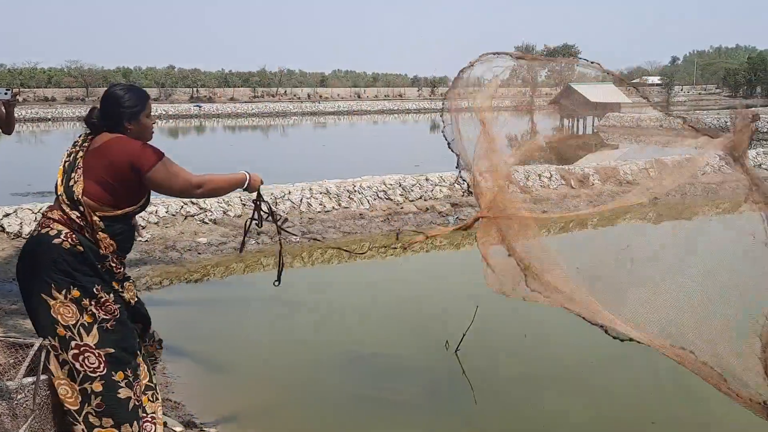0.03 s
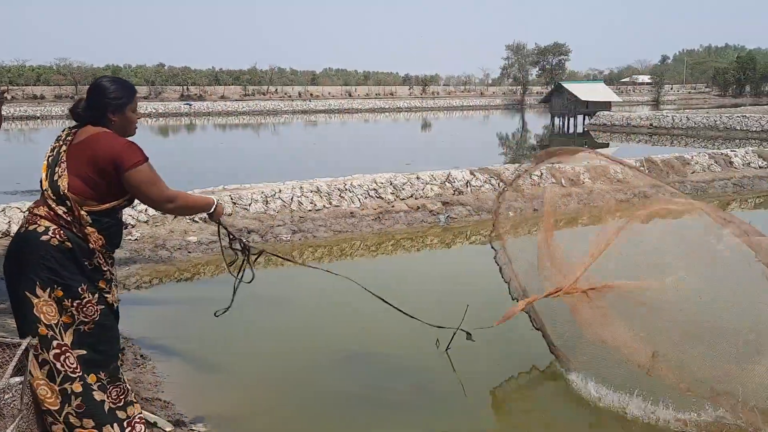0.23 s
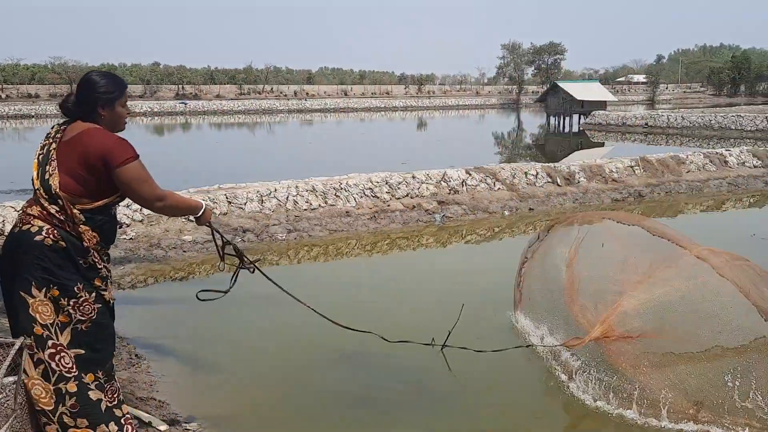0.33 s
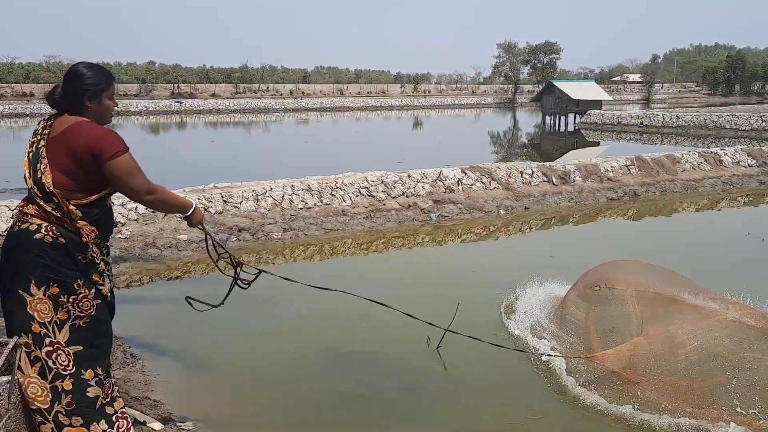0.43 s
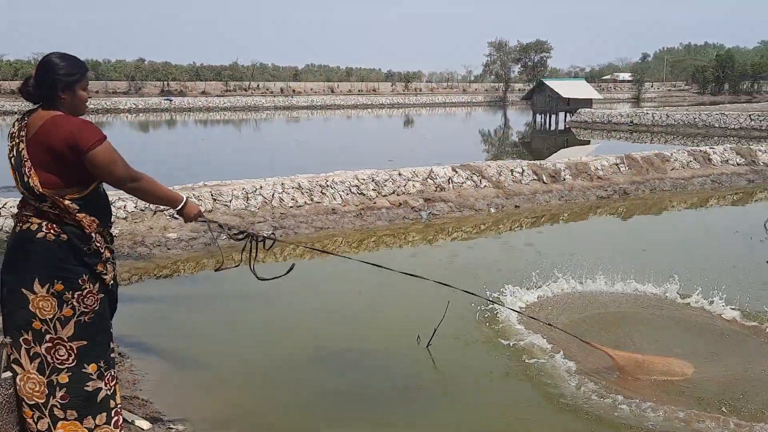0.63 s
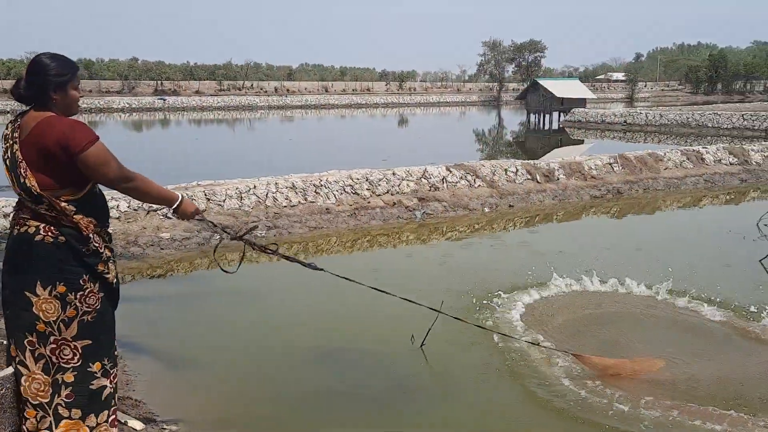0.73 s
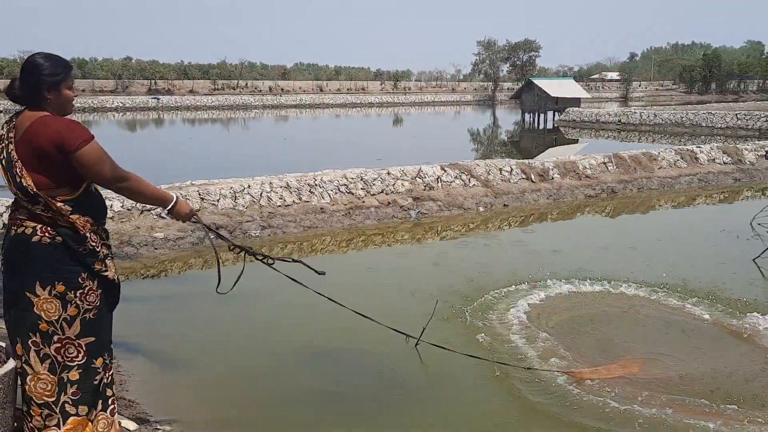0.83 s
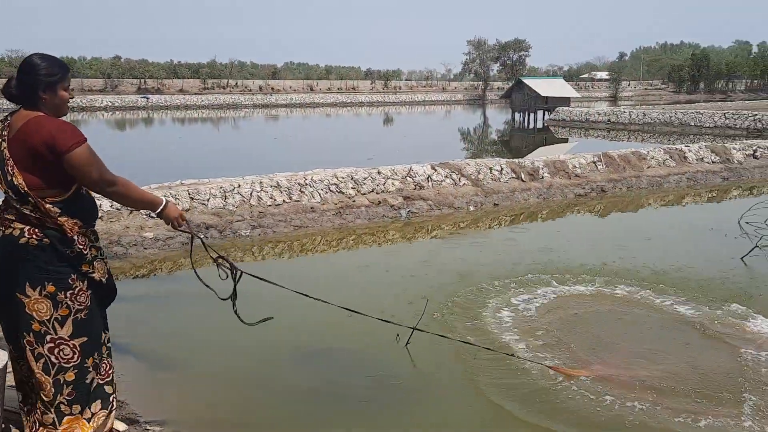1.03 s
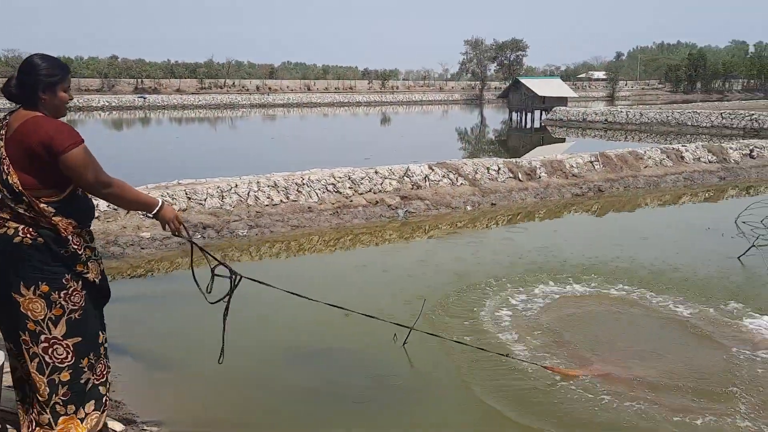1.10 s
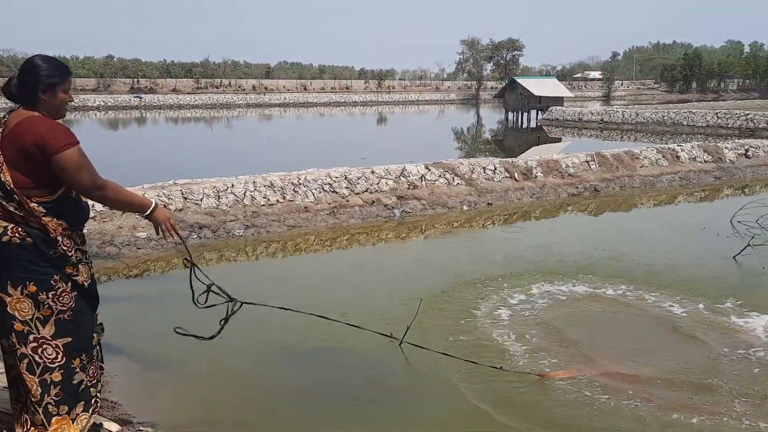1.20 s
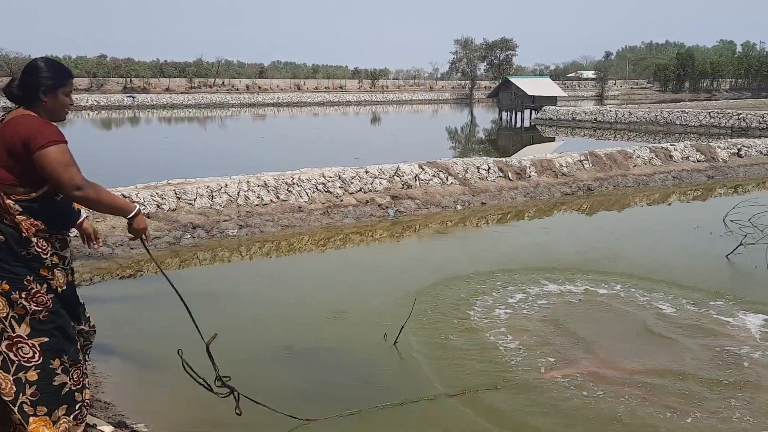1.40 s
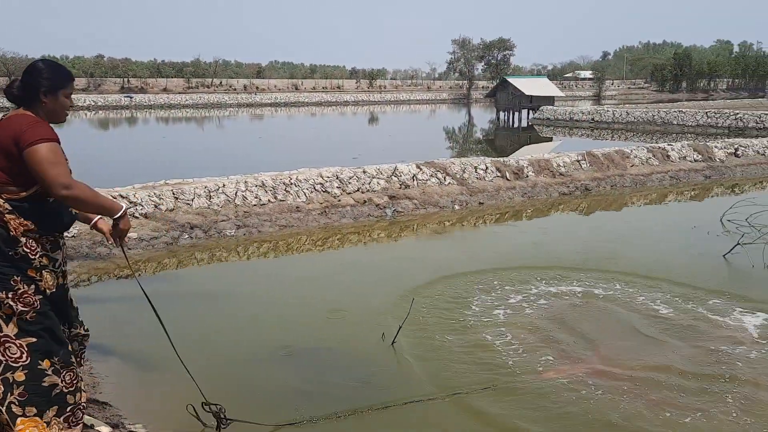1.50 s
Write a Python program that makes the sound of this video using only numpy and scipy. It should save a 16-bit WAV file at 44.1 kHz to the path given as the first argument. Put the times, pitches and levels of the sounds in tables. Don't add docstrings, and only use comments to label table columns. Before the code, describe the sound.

A weighted cast net hits a pond with a broad, sharp splash after a faint swish and tiny clinks; trapped air gurgles, foam fizzes out, and a wet line flicks softly, outdoors on a stereo microphone.

```python
import sys
import numpy as np
from scipy import signal
from scipy.fft import rfft, irfft, next_fast_len
from scipy.io import wavfile
from scipy.ndimage import uniform_filter1d, map_coordinates

SR = 44100
rng = np.random.default_rng(int(sys.argv[2]) if len(sys.argv) > 2 else 0)


def makeup_ratio(level_db):
    decades = np.asarray(level_db, float) / 20
    return 10 ** decades


def dump_mix(stems):
    frames = np.atleast_2d(stems).T
    limited = np.clip(frames, -1, 1)
    pcm = np.round(limited * 32767).astype(np.int16)
    wavfile.write(sys.argv[1], SR, pcm)


N = 68355
TIME = np.arange(N) / SR

# time_s, level_db
SPRAY_LEVEL = [(.2342, -77.5), (.2365, -43), (.243, -32), (.26, -29.5), (.284, -39.5), (.32, -35),
               (.36, -34), (.5, -35), (.518, -34.5), (.538, -36.5), (.556, -39.5), (.68, -43.5),
               (.78, -44.5), (.81, -40.5), (.83, -44.5), (1.1, -56.5), (1.3, -57), (1.55, -60)]
# pitch_hz, level_db (per Hz)
SPRAY_TONE = [(1300, -24.5), (1900, -5.5), (2300, -2), (3400, -6), (6300, -4.5), (9300, -13.5),
              (11500, -10), (13500, -10.5), (15800, -19)]
FINE_FOAM_S = (0.251, .3, 0.902, 1.203)
# time_s, level_db
GURGLE_LEVEL = [(0.24, -54), (0.256, -44.5), (0.304, -28.5), (0.312, -23.5), (0.336, -28.5), (0.402, -26),
                (0.434, -21), (0.464, -27.5), (0.472, -24.5), (0.588, -23), (0.608, -31), (0.674, -34),
                (0.87, -34), (1.038, -45.5), (1.046, -41), (1.082, -46.5), (1.266, -61), (1.29, -66)]
# pitch_hz, level_db (per Hz)
GURGLE_TONE = [(70, -60), (130, -27.5), (470, -6), (950, -5.5), (2500, -8), (3200, -18.5), (5000, -21.5),
               (7000, -50)]
SMALL_BUBBLES_S = (0.83, 1.247)
# start_s, peak_db, pitch_hz
POCKETS = [(.255, -38.5, 1190), (.256, -36, 2440), (.296, -46, 690), (.309, -21.5, 582), (.31, -30, 1340),
           (.311, -24.5, 972), (.312, -27.5, 1192), (.313, -27.5, 800), (.314, -33, 1610),
           (.325, -27.5, 604), (.34, -26.5, 890), (.377, -28.5, 439), (.407, -31.5, 289), (.414, -30, 2340),
           (.423, -24.5, 943), (.424, -32, 1440), (.427, -34, 743), (.43, -18.5, 539), (.435, -31, 2570),
           (.442, -27, 623), (0.453, -31, 1335), (0.468, -23, 430), (.472, -28, 812), (0.481, -29, 928),
           (.49, -22.5, 570), (.495, -28, 845), (.501, -22.5, 472), (.509, -25.5, 1242), (.522, -24.5, 578),
           (.534, -25.5, 538), (.545, -31.5, 728), (.55, -30, 355), (0.57, -44, 404), (0.57, -25.5, 1874),
           (.571, -30, 545), (.578, -26, 770), (0.587, -35.5, 409), (0.649, -35.5, 491), (.667, -40.5, 324),
           (.687, -44, 814), (.728, -32.5, 1232), (0.765, -44, 932), (0.787, -31.5, 1656),
           (.808, -38.5, 835), (0.813, -39.5, 351), (.857, -30.5, 506), (.875, -36.5, 518),
           (.891, -34.5, 1814), (.895, -39.5, 491), (0.936, -37.5, 532), (.944, -39, 2290),
           (.957, -44.5, 416), (1.009, -41, 556), (1.039, -41.5, 1132), (1.045, -35, 1663),
           (1.051, -46.5, 492), (1.145, -51.5, 1137), (1.191, -52.5, 1650), (1.236, -51, 1884),
           (1.25, -49.5, 2660),
           (.26, -52, 600), (.654, -35, 1753), (.721, -45, 922), (.878, -47, 1130), (.905, -45, 550),
                (.92, -45, 880), (.99, -47, 494), (1.097, -57, 298), (1.12, -61, 300), (1.12, -66, 590),
                (1.145, -62, 880), (1.15, -52, 1770), (1.185, -60, 2220), (1.257, -57, 2230),
                (1.258, -66, 1110)]
# start_s, level_db
SLAPS = [(.2474, -29), (.4165, -27), (.466, -27), (.4864, -20), (.5052, -27), (.5108, -19), (.5145, -24),
         (.5205, -25), (.5255, -21), (.607, -33), (.687, -35), (.791, -32), (.811, -32)]
# start_s, level_db
PLUNGES = [
    (.3118, -24),
    (.4255, -33),
    (.4385, -26),
    (.577, -29),
    (.581, -29),
    (.859, -37),
    (1.256, -54),
]
# pitch_hz, level_db
PLUNGE_TONE = [(200, -50), (420, -2), (600, 0), (1000, -6), (2000, -9), (3200, -18), (5000, -50)]
# start_s, level_db
FLICKS = [
    (1.4645, -52),
    (1.468, -41),
    (1.471, -50),
    (1.4748, -52),
    (1.4787, -42),
    (1.483, -51),
    (1.487, -53),
]
# pitch_hz, level_db
FLICK_TONE = [(1500, -45), (2400, -12), (3700, -12), (6000, 0), (7700, -4), (9300, -15), (11500, -9),
              (14000, -9), (15800, -18)]
# start_s, level_db
TICKS = [
    (.0805, -57),
    (.1128, -52),
    (.1556, -42),
    (.159, -55),
    (.1875, -62),
    (.2205, -53),
]
# pitch_hz, level_db
TICK_TONE = [(1500, -36), (2870, -15), (4000, -30), (5300, -14), (6900, -3), (9500, -17), (12500, 0),
             (15800, -8)]
# pitch_hz, t60_s (time to fade by 60 dB)
BANGLE_RINGS = [
    (9330, .045),
    (10900, .035),
    (11400, .04),
    (13900, .018),
]
# start_s, then level_db of each ring
CLINKS = [(.059, -54, -55, -75, -57), (.0707, -62, -75, -75, -48), (.0805, -75, -51, -54, -68),
          (.1126, -75, -60, -64, -53), (.118, -60, -58, -68, -62), (.171, -59, -60, -62, -72),
          (.1875, -61, -53, -62, -70), (.203, -62, -70, -75, -75)]
# start_s, peak_db, pitch_hz
TAPS = [
    (0.04, -51, 960),
    (0.073, -54, 4930),
]
# pitch_hz, width_hz, level_db
CORD_TONES = [
    (820, 75, 6),
    (1410, 45, 8.5),
    (1586, 44, 9.5),
    (1750, 18, 5),
]
# time_s, level_db
CORD_PULL = [(0, -76), (.11, -67.5), (.16, -75), (.2, -84)]
# time_s, level_db
SWISH_LEVEL = [(0, -56.5), (.04, -53.5), (.075, -56.5), (.1, -75.5), (.16, -86), (.22, -83.5)]
# pitch_hz, level_db (per Hz)
SWISH_TONE = [(120, -67), (290, -17), (500, -29), (1570, -11.5), (2400, -17.5), (5500, -17), (8500, -24),
              (15800, -23)]
# time_s, level_db
BREEZE_LEVEL = [(0.0, -81), (0.128, -88), (0.318, -79), (0.574, -71.5), (1.004, -80), (1.096, -80),
                (1.55, -79)]
# pitch_hz, level_db (per Hz)
RUMBLE_TONE = [(12, -61.5), (32, -5.5), (90, 1), (124, -1.5), (231, -11.5), (520, -19), (600, -22.5),
               (780, -62), (1320, -120)]
# time_s, level_db
PUFFS = [
    [(.062, -92), (.075, -62), (.185, -67), (.2, -79)],
    [(1.4, -86), (1.425, -67), (1.48, -71), (1.52, -82.5)],
]
# pitch_hz, level_db
PUFF_TONE = [(30, -54), (70, -16), (155, -7.5), (220, -18.5), (330, -11), (480, -30.5), (900, -120)]
# pitch_hz, level_db
HISS_TONE = [(60, -39), (240, -2), (400, -3.5), (644, -9.5), (1330, -9), (2600, -7), (3900, -18),
             (6000, -9), (9510, -11), (15800, -3.5)]
# pitch_hz, likeness (1 = same)
ALIKE = [(60, 0.94), (250, 0.53), (600, 0.2), (1300, 0.12), (5000, 0.04), (15000, 0.04)]
# pitch_hz, left_minus_right_db
PORT_LEAN = [(60, 1.5), (200, 3.5), (380, -2.5), (700, 3), (4400, 0.5), (8100, 3), (12000, 10)]

LAG_S = 0.000301
FLICK_T60_S, SLAP_T60_S, PLUNGE_T60_S = 0.014, 0.013, 0.038
SNAP_RISE_S = 0.006


def unit(x):
    return x / np.sqrt(np.mean(x ** 2) + 1e-20)


def along(points, hz):
    f, v = np.transpose(points)
    return np.interp(np.log(hz + 1), np.log(f + 1), v)


def level(rows):
    s, db = np.transpose(rows)
    return makeup_ratio(np.interp(TIME, s, db, left=-120, right=-120))


def wobble(rate):
    return map_coordinates(rng.standard_normal(2000), [np.arange(N) * rate / SR + 2])


def filtered(x, response):
    m = next_fast_len(N + 8192)
    return irfft(rfft(x, m) * response(np.fft.rfftfreq(m, 1 / SR)), m)[..., :N]


def bed(x, tone):
    return unit(filtered(x, lambda hz: makeup_ratio(along(tone, hz))))


def rush(patchy_db, alike=ALIKE):
    z = signal.stft(rng.standard_normal((2, N + 512)), nperseg=256)[2]
    field = uniform_filter1d(rng.standard_normal(z.shape[1:]), size=6, axis=0)
    field = uniform_filter1d(field, size=5, axis=1)
    pair = signal.istft(z * makeup_ratio(patchy_db * unit(field)), nperseg=256)[1][:, :N]

    def mid_and_side(hz):
        angle = np.arccos(np.clip(along(alike, hz), -1, 1)) / 2
        return np.array([np.cos(angle), np.sin(angle)])

    mid, side = filtered(pair, mid_and_side)
    return unit(np.array([mid + side, np.roll(mid - side, round(LAG_S * SR))]))


def blips(s, gain, hz, decay_s, rise, lag_s, attack, size):
    draw, out = rng.standard_normal((len(s), 2, 2)), []
    right_lag_s, scatter_s = lag_s
    for port in range(2):
        start = (s + port * right_lag_s + scatter_s * np.abs(draw[:, port, 0])) * SR
        t = (np.arange(size) + 1 - start[:, None] % 1) / SR
        u = t / decay_s[:, None]
        wave = np.sin(2 * np.pi * hz[:, None] * t * (1 + rise * (u - 1) / 2))
        wave *= np.exp(-u) * (1 - np.exp(-attack * u))
        wave *= (gain * makeup_ratio(1.5 * draw[:, port, 1]))[:, None]
        wave *= np.hanning(2 * size)[size:]
        at = start.astype(int)[:, None] + 1 + np.arange(size)
        out.append(np.bincount(at.ravel(), wave.ravel(), N + SR)[:N])
    return np.array(out)


def swarm(count, low_hz, high_hz, cycles, spread_db, rise, size):
    u = rng.random((count, 3))
    hz = low_hz + (high_hz - low_hz) * u[:, 1]
    loudness = np.minimum(-np.log(1 - u[:, 2]), 1.8)
    gain = np.sqrt(hz) * makeup_ratio(spread_db * loudness)
    return unit(blips(u[:, 0] * N / SR, gain, hz, cycles / hz, rise, (LAG_S, 0.00022), 19, size=size))


def spray():
    drops = swarm(count=9000, low_hz=1360, high_hz=17660, cycles=4, spread_db=1.5, rise=0.014, size=96)
    mix = bed(0.62 * drops + 0.78 * rush(patchy_db=0.46), SPRAY_TONE)
    fine = filtered(mix, lambda hz: makeup_ratio(-10.5 / (1 + (hz / 4610) ** 6)))
    coarse_share = np.interp(TIME, FINE_FOAM_S, [0, 1, 1, 0])
    foam = coarse_share * mix + (1 - coarse_share) * fine
    return foam * level(SPRAY_LEVEL) * makeup_ratio(4.0 + 1.1 * wobble(41) + 0.37 * wobble(160))


def pockets():
    s, db, hz = np.transpose(POCKETS)
    decay_s = 1.3 / hz + 0.0077
    return blips(s, 1.15 * makeup_ratio(db), hz, decay_s, 0.015, (0.00006, 0.00005), 4.94, size=2000)


def gurgle():
    crowd = swarm(count=3600, low_hz=169, high_hz=5997, cycles=8.5, spread_db=0.5, rise=0.022, size=900)
    mix = bed(0.45 * crowd + 0.85 * rush(patchy_db=0.5), GURGLE_TONE)
    small = unit(filtered(mix, lambda hz: 1 / (1 + (1590 / (hz + 1)) ** 3)))
    late = np.interp(TIME, SMALL_BUBBLES_S, [0, 1])
    return ((1 - late) * mix + late * small) * level(GURGLE_LEVEL) * makeup_ratio(-4 + 0.6 * wobble(60))


def snaps(events, t60, pan_db, tone):
    noise = bed(rush(patchy_db=1.2), tone)
    shape = 0
    for s, db in events:
        fade_s = np.where(TIME >= s, t60, SNAP_RISE_S)
        shape = shape + makeup_ratio(db - 60 * np.abs(TIME - s) / fade_s)
    return noise * shape * makeup_ratio([[pan_db / 2], [-pan_db / 2]])


def rim_weights():
    slaps = snaps(SLAPS, SLAP_T60_S, 0.54, FLICK_TONE)
    return slaps + snaps(PLUNGES, PLUNGE_T60_S, 0, PLUNGE_TONE)


def line_and_knots():
    flicks = snaps(FLICKS, FLICK_T60_S, 2.2, FLICK_TONE)
    return flicks + snaps(TICKS, FLICK_T60_S, 2.5, TICK_TONE)


def bangles():
    out = 0
    for s, *levels in CLINKS:
        t = np.clip(TIME - s, 0, None)
        for (hz, t60), db in zip(BANGLE_RINGS, levels):
            ring = np.sin(2 * np.pi * hz * rng.normal(1, 0.0035) * t)
            out = out + makeup_ratio(db - 60 * t / t60) * ring * (1 - np.exp(-t / 0.00015))
    return out * makeup_ratio(-1 + 3 * wobble(350)) * makeup_ratio([[3], [-5]])


def cord():
    def resonances(f):
        return sum(makeup_ratio(db) * 1j * f * w / (c * c - f * f + 1j * f * w) for c, w, db in CORD_TONES)

    song = unit(filtered(rush(patchy_db=-5.5), resonances)) * level(CORD_PULL)
    s, db, hz = np.transpose(TAPS)
    return song + blips(s, 1.9 * makeup_ratio(db), hz, 0.0018 + 1.6 / hz, 0, (0, 0.00005), 4.4, size=900)


def swish():
    return bed(rush(patchy_db=4.0), SWISH_TONE) * level(SWISH_LEVEL)


def breeze():
    rumble = bed(rush(1, [(30, 0.89), (300, 0.68)]), RUMBLE_TONE)
    rumble = rumble * level(BREEZE_LEVEL) * makeup_ratio(8.5 + 2.0 * wobble(6.7))
    return rumble + bed(rush(0.92, [(30, 1.0)]), PUFF_TONE) * sum(map(level, PUFFS))


def hiss():
    return makeup_ratio(-64.5) * bed(rush(patchy_db=-2.0), HISS_TONE)


def scene():
    water = spray() + gurgle() + pockets() + rim_weights()
    net = line_and_knots() + bangles() + cord() + swish()
    return water + net + breeze() + hiss()


def roll_off(x):
    return signal.sosfilt(signal.butter(12, 16530, fs=SR, output="sos"), x)


def record(dry):
    def port_gain(hz):
        lean_db = np.outer([0.5, -0.5], along(PORT_LEAN, hz))
        return makeup_ratio(-0.5 + lean_db) * (hz < 15745)

    return roll_off(filtered(dry, port_gain))


dry = scene()
out = record(dry)
dump_mix(out)
```